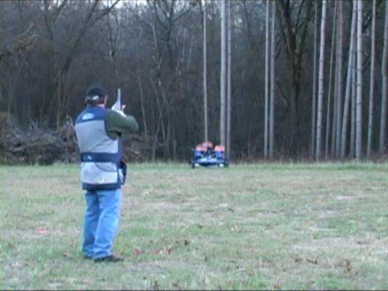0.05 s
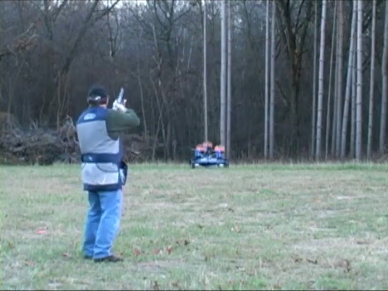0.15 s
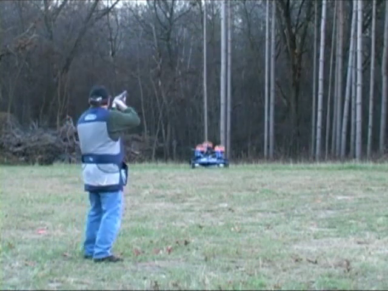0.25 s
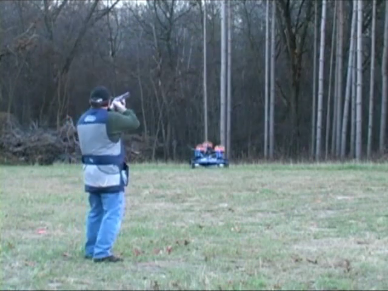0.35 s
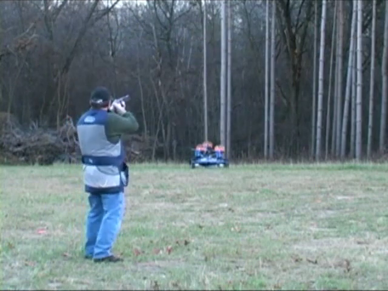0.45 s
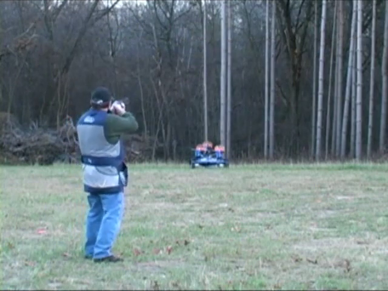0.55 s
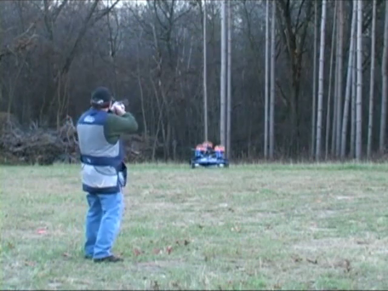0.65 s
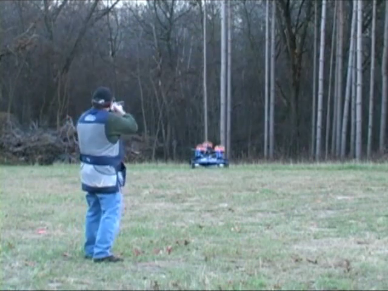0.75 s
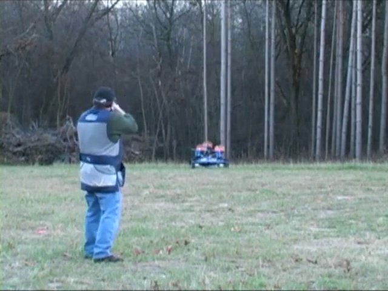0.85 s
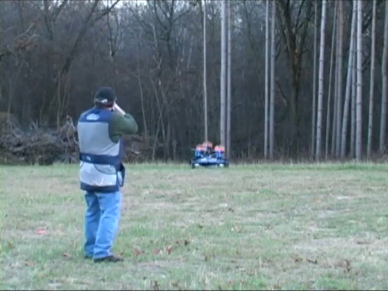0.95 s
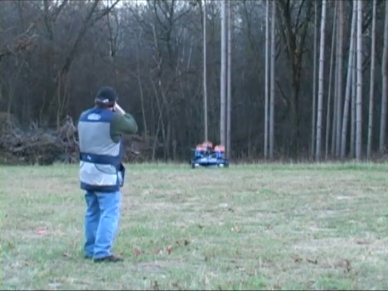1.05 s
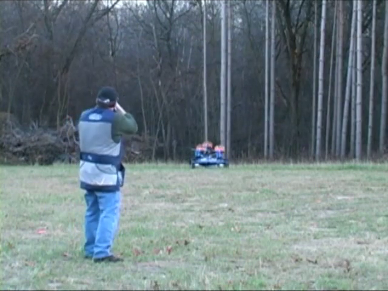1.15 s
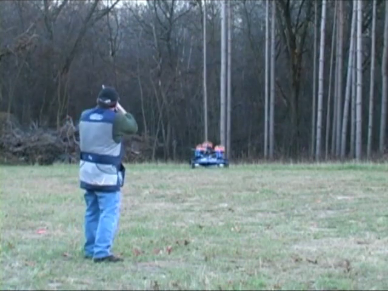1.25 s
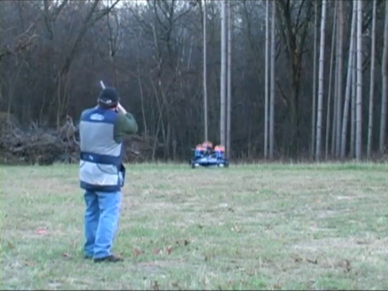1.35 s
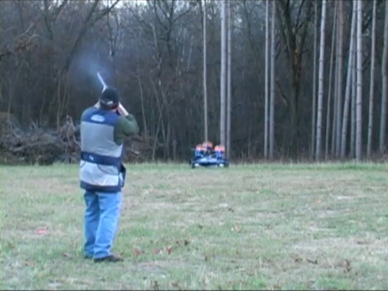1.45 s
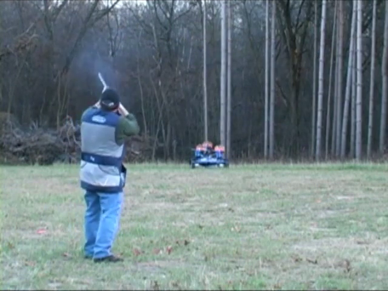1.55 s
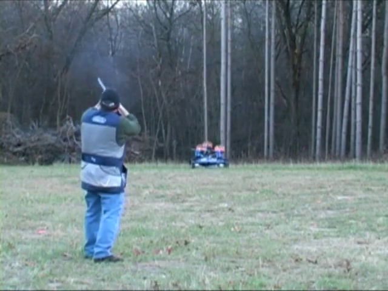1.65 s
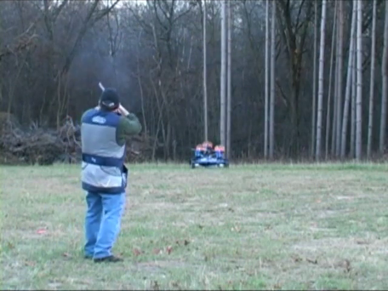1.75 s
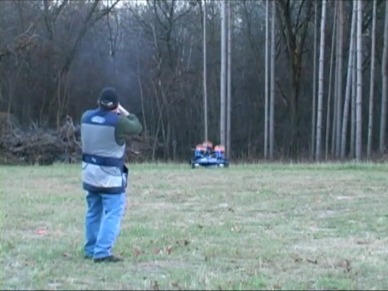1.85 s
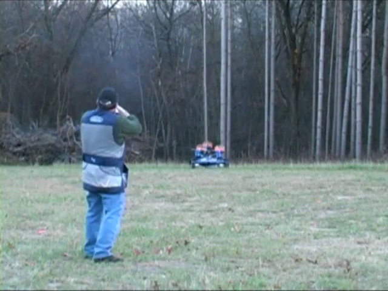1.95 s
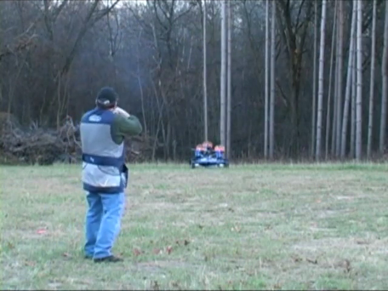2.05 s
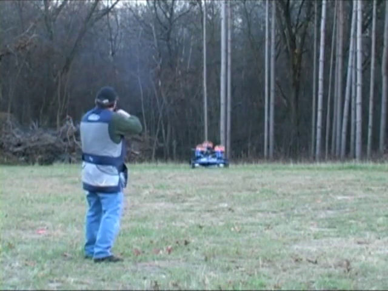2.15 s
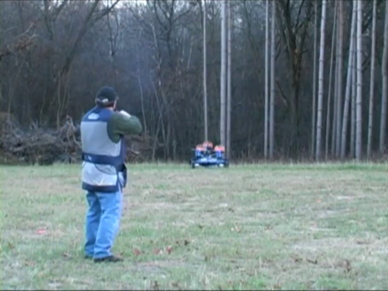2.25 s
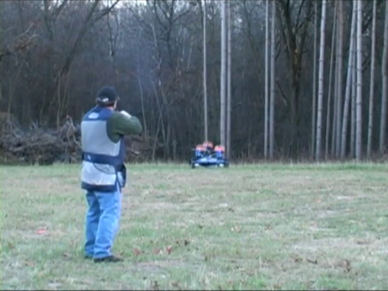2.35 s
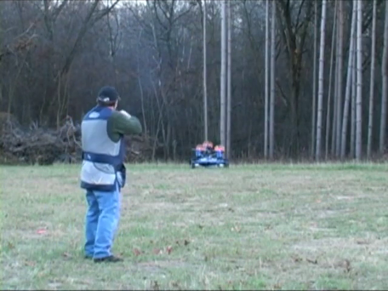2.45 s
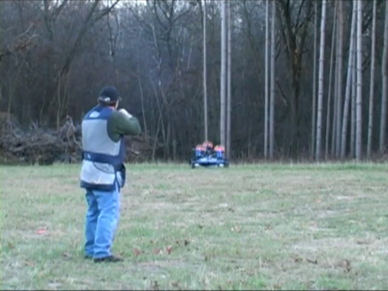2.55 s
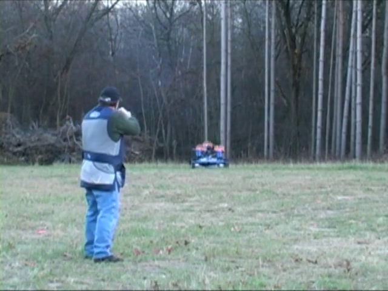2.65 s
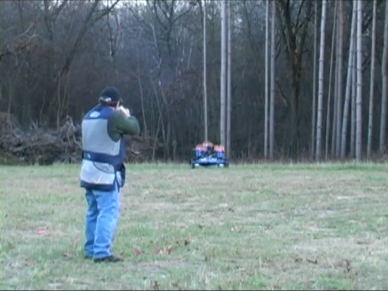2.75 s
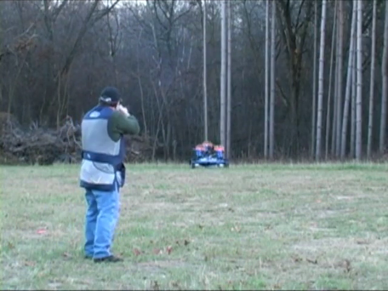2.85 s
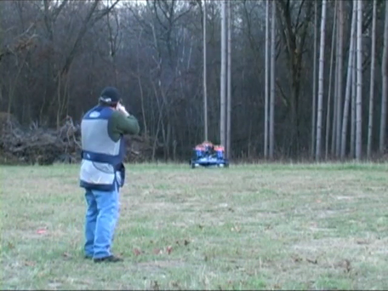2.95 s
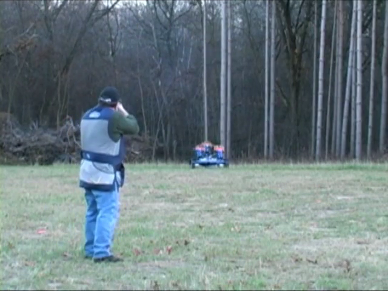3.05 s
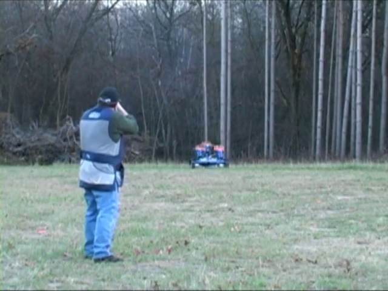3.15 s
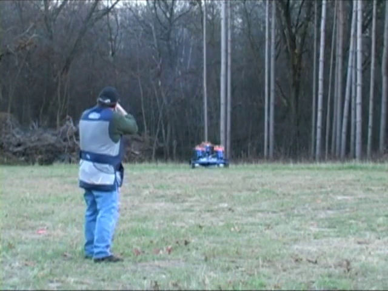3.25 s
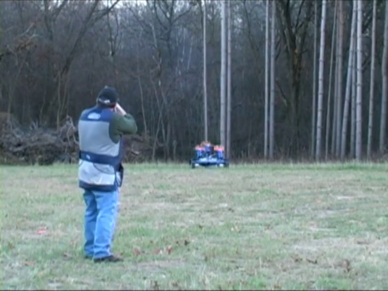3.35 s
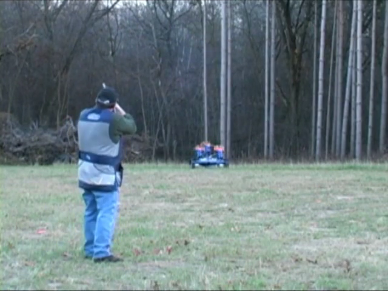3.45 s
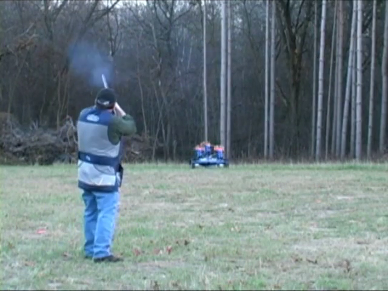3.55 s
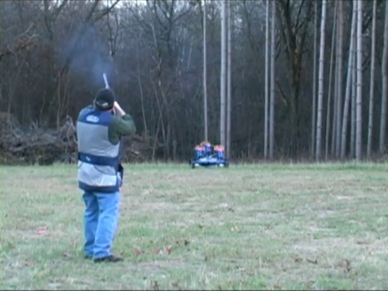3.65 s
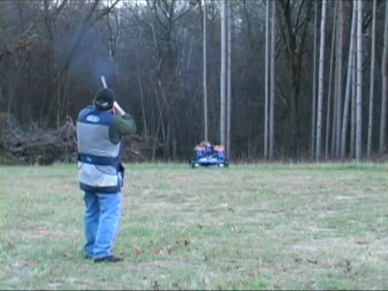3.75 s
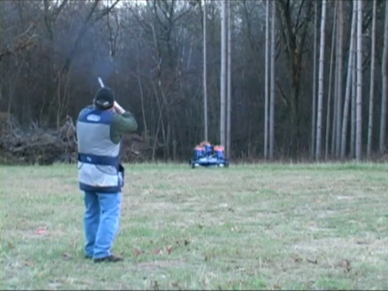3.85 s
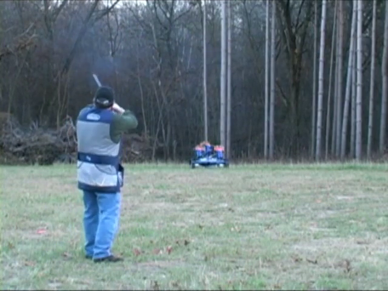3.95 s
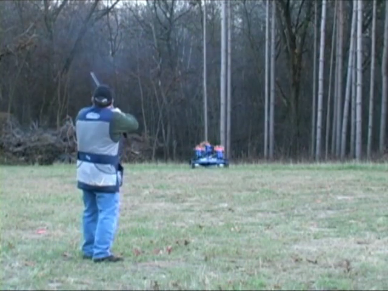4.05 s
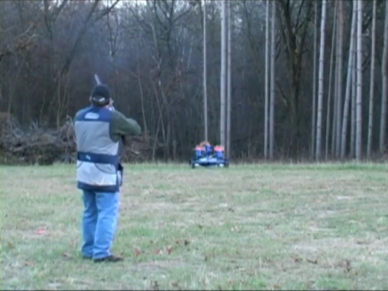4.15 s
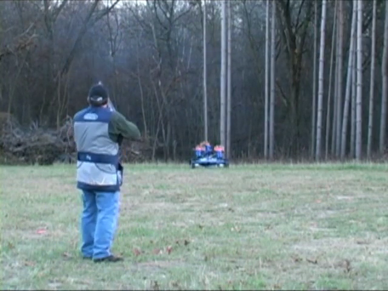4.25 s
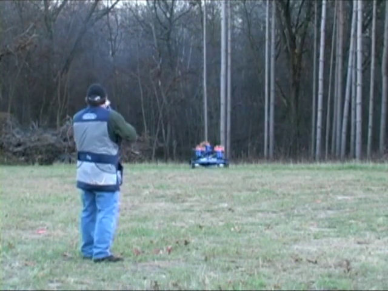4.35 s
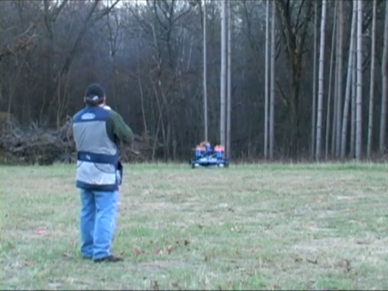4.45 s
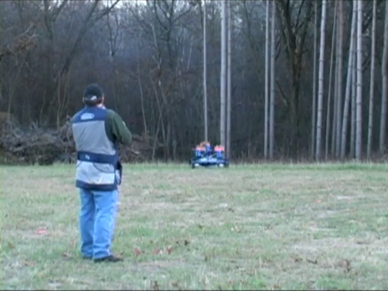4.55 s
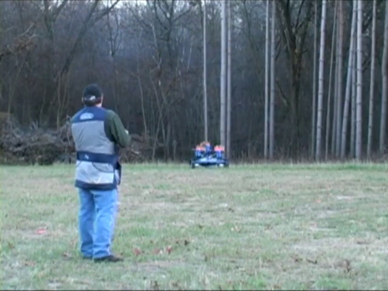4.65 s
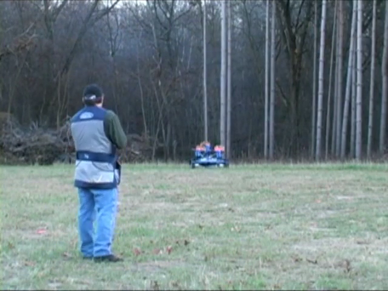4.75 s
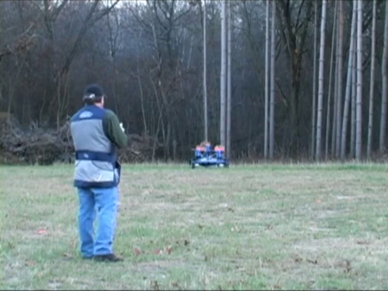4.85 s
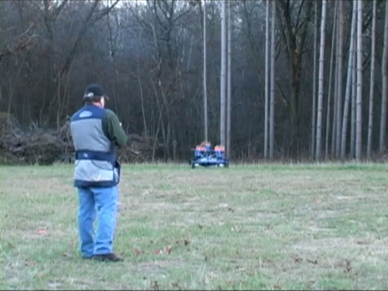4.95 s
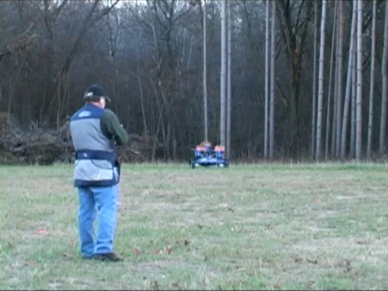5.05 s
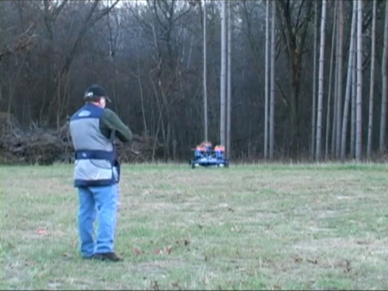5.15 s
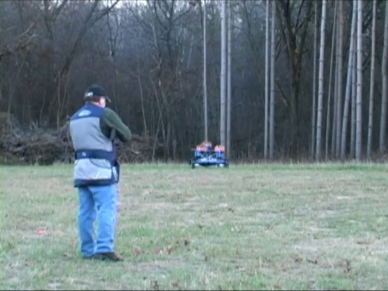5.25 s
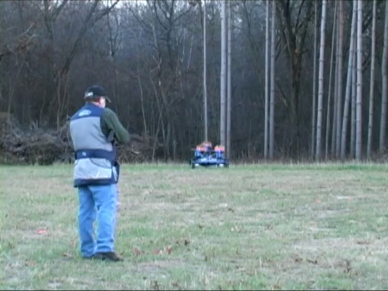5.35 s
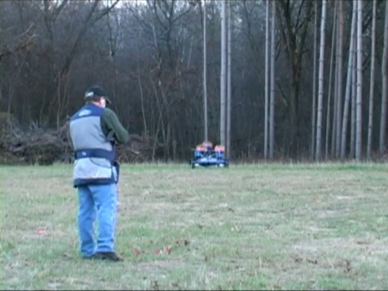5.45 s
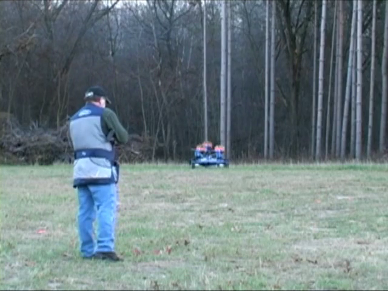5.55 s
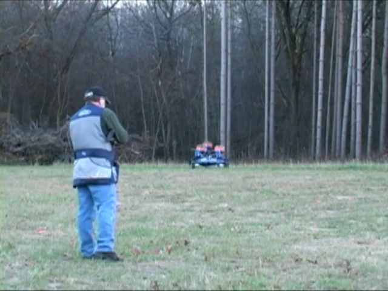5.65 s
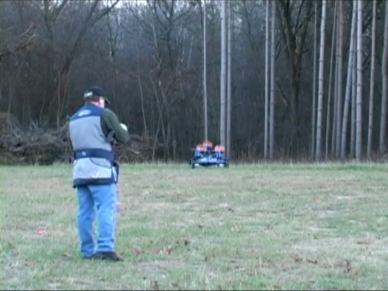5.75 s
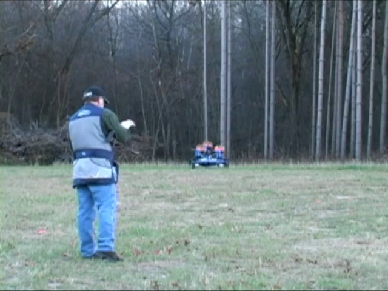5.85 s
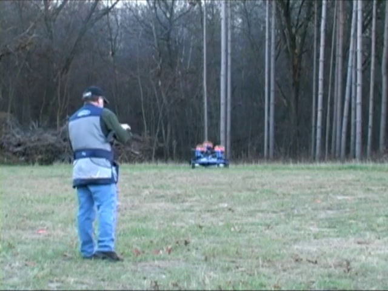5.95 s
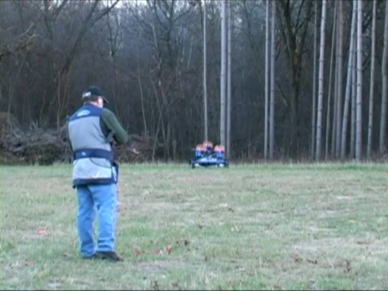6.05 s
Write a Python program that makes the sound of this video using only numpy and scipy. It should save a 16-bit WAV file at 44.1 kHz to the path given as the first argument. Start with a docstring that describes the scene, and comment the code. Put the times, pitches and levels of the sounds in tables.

```python
"""Two shotgun blasts by bare woods

Each blast is a noise crack on a slow pressure swing, loud enough to overload the input. Near objects
return single slaps; then the woods scatter it as noise into a long roll that the air dulls.
A clay thrower scrapes, rings and rattles before each shot. Handling the gun and shells makes short
ringing knocks, a ping of brass and soft cloth rustles, over far traffic, light air and a quiet hiss."""
import sys
import numpy as np
from scipy import signal
from scipy.fft import rfft, irfft, next_fast_len
from scipy.io import wavfile
from scipy.ndimage import uniform_filter1d

SR = 44100
rng = np.random.default_rng(int(sys.argv[2]) if len(sys.argv) > 2 else 0)


def file_out(sig):
    """Save sig as 16-bit WAV at sys.argv[1]."""
    # one column per channel
    cols = np.atleast_2d(sig).T
    # limit, then scale
    lim = np.clip(cols, -1, 1)
    pcm = np.round(lim * 32767).astype(np.int16)
    wavfile.write(sys.argv[1], SR, pcm)


N = 269391
TIME = np.arange(N) / SR
STEREO = np.array([[1], [-1]])  # left plus, right minus


def shots():
    """Each shot sends out a blast, then single slaps and the roll of the woods arrive later."""
    # the two shots: t/s, blast level/dB, lead-in level/dB, boom change/dB, brightness/dB per octave
    shot_list = [(1.5148, 3, -14.5, -0.4, 1.17), (3.6273, -2, -6, -3.5, 1)]
    # single reflectors: delay/s, crack level of first shot/dB, of second shot/dB, centre f/Hz,
    # thump level/dB, left minus right/dB
    reflectors = [(.0370, -2.5, -3.5, 3770, -6.5, 2), (0.046, -33, -22, 3500, -45, -2),
                  (0.0545, -26, -24, 2640, -43, 18), (0.078, -22, -26.5, 2470, -44, 30),
                  (0.09, -20.5, -24, 1010, -44, 24), (.1160, -20, -21, 2190, -41, 27),
                  (0.123, -17.5, -32, 2440, -40, 18), (.1305, -25, -13.5, 3300, -28, -7),
                  (0.141, -11, -38, 1990, -30, .3), (0.16, -2.5, -5.5, 1540, -16, 3),
                  (0.1667, -8.5, -11, 1350, -16, -8), (.2370, -21, -23, 475, -9, -1.5),
                  (.2600, -12, -21, 3000, -26, 0), (0.2855, -6, -5, 2500, -29, 1),
                  (0.301, -7, -5, 3000, -17, 5), (0.3117, -16, -4, 2520, -44, -6),
                  (.3490, -15, -19, 2020, -11, -9), (.3590, -15, -34, 1490, -21, -7)]
    out = np.zeros((2, N))
    for k, (s, blast_db, lead_db, boom_db, tilt_db) in enumerate(shot_list):
        add(out, s - .004, blast(blast_db, lead_db))
        add(out, s + .004, woods(boom_db, tilt_db))
        for delay, *crack_db, hz, thump_db, pan_db in reflectors:
            # lone trunks at the wood's edge answer shorter
            t60 = 0.014 if delay < .25 else 0.0082
            add(out, s + delay, slap(crack_db[k], hz, thump_db, t60), pan_db)
    return out


def blast(db, lead_db, lead_s=0.0036, hold_s=0.004):
    """Turbulent muzzle crack riding on a suction that swings slowly back; a short lead-in comes first."""
    # colour of the crack: f/Hz, relative level/dB per Hz
    crack_colour = [(180, -19), (300, -9.5), (2450, -4.5), (3560, -9.5), (4430, -3.5), (8250, -14),
                    (11600, -13), (12400, -19), (16100, -45), (22000, -120)]
    t = np.arange(4096) / SR - lead_s
    mid, side, lead_noise = rng.standard_normal((3, len(t)))
    envelope = np.where(t < hold_s, t >= 0, fade(t - hold_s, 0.0061))
    crack = colour(mid + 0.15 * side * STEREO, crack_colour) * envelope
    suction = -.42 * np.exp(-((t - .002) / .0027) ** 2)
    swing_back = .105 * np.exp(-((t - .014) / .011) ** 2) * np.clip(t / .008, 0, 1)
    # a 900 Hz tone with broad noise, ending where the crack starts
    lead = np.sin(2 * np.pi * 900 * t) + .5 * ring(lead_noise, 3000., 4000.)
    lead = lead * np.clip((t + lead_s) / .001, 0, 1) * (t < 0)
    return undb(db) * crack + suction + swing_back + undb(lead_db) * lead


def slap(crack_db, hz, thump_db, t60):
    """One reflector returns a burst in its own colour and, just behind it, a low thump."""
    # colour shared by all the bursts: f/Hz, relative level/dB per Hz
    burst_colour = [(200, -6), (600, 15), (2000, 8.5), (6000, 9), (9500, -3.5), (12500, -33)]
    t = np.arange(8192) / SR
    noise = colour(rng.standard_normal(len(t)), burst_colour)
    burst = noise * fade(t, t60) * np.minimum(1, t / 0.00062)
    crack = .5 * burst + 1.82 * ring(burst, hz, 0.38 * hz)
    late = t - .0015
    thump = np.sin(2 * np.pi * 253.0 * late) * fade(late, 0.025)
    return undb(crack_db) * crack + undb(thump_db) * thump


def woods(boom_shift_db, tilt_db):
    """Noise scattered by grass and trees, split into bands that each fade by their loss in air."""
    # level of the scattered sound: delay/s, level/dB
    roll = [(0, -13), (0.033, -21), (.11, -19), (.16, -11.5), (.232, -9.5), (.246, -5.5), (.34, -2),
            (.75, -6.5), (1.6, -23), (2.5, -31)]
    s, level_db = np.transpose(roll)
    n = next_fast_len(int(s[-1] * SR))
    t = np.arange(n) / SR
    broad_db = np.interp(t, s, level_db)
    boom_db = bass_boom_db(t) + boom_shift_db
    hump_db = mid_hump_db(t)
    both, octave = scattered(t, tilt_db)
    boom_hz, boom_oct, hump_hz, hump_oct = 225, 0.76, 831, 0.63  # centres and half widths
    air_db, air_power, air_ease = 16.5, 1.478, 1  # loss at 3 kHz after 1 s, exponents of pitch and delay
    hiss_db, hiss_top_hz = -37.5, 8500.  # faint treble hiss that follows the level of the roll
    out = 0
    for centre in np.arange(-15, 13) / 3:  # third-octave steps, counted in octaves from 1 kHz
        band = irfft(both * np.clip(1 - 3 * abs(octave - centre), 0, 1), n)
        f = 1000 * 2 ** centre
        boom = np.exp(-(np.log2(f / boom_hz) / boom_oct) ** 2)
        hump = np.exp(-(np.log2(f / hump_hz) / hump_oct) ** 4)
        loss_db = air_db * (f / 3000) ** air_power * t ** air_ease
        hiss = undb(hiss_db) / (1 + (f / hiss_top_hz) ** 8)
        flicker_db = 1.3 * walk(9, n)
        band_db = broad_db + boom * boom_db + hump * hump_db + flicker_db
        out = out + band * undb(band_db) * (undb(-loss_db) + hiss)
    return out


def bass_boom_db(t):
    """Extra bass from the near ground just after the blast, then from the wood's edge all at once."""
    ground_db, ground_s, steady_db = 15, .06, -1.2
    edge_s, boom_shift_db, rise_s, hold_s, fall_s = 0.227, 11, 0.0069, 0.066, 0.045
    edge = ramp(t, edge_s, rise_s) - ramp(t, edge_s + hold_s, fall_s)
    return ground_db * np.exp(-t / ground_s) + boom_shift_db * edge + steady_db


def mid_hump_db(t):
    """Extra middle pitches that grow as the far stands answer and sink at the end."""
    hump_db, from_s, rise_s, until_s, sink_db_per_s = 6.5, .28, .2, 1.78, 7
    return hump_db * ramp(t, from_s, rise_s) - sink_db_per_s * np.maximum(t - until_s, 0)


def scattered(t, tilt_db):
    """Stereo spectrum of the scattered noise: grainy where trunks answer apart, smooth elsewhere."""
    # colour of the scattered sound: f/Hz, level/dB per Hz
    trunk_colour = [(30, -21), (70, -10), (130, -3.5), (240, 5), (350, -1), (500, -2), (900, -2),
                    (1500, -4.5), (2200, -2), (4000, -4), (7000, -5), (12500, -11.5)]
    # left-right difference against the middle: f/Hz, level/dB
    wood_width = [(60, -27.5), (190, -11), (350, -11), (630, -15.5), (1130, -4.5), (2040, -5.5),
                  (3680, -11), (6620, -96), (11900, -36)]
    # balance: f/Hz, left minus right/dB
    wood_pan = [(60, -2.5), (110, -0.5), (190, -0.5), (350, -0.5), (630, 1), (1130, 3.5), (2040, 2),
                (3680, 1), (6620, -2.5), (11900, 5)]
    # phase of the middle signal: f/Hz, lead of the left side/radians
    wood_lead = [(60, 0.024), (260, -0.1), (690, -0.91), (1290, 0.17), (3360, -0.82), (4050, 0.21),
                 (5900, 0)]
    n = len(t)
    trunks = grains(420., 2.7, .0008, n)
    clear = .5 * np.exp(-((t - .3) / .22) ** 2)  # share of separate bursts
    texture = np.sqrt(clear * trunks ** 2 + 1 - clear)
    # stands of trees at uneven distances make the roll surge
    surge = undb(3.1 * walk(21.9, n))
    mid, side = rfft(texture * rng.standard_normal((2, n)) * surge)
    octave = np.log2(np.maximum(np.arange(n // 2 + 1) * SR / n, 1) / 1000)
    hz = 1000 * 2 ** octave
    mid_db = at(trunk_colour, hz) + tilt_db * octave
    mid = mid * undb(mid_db)
    side = side * undb(mid_db + at(wood_width, hz))
    both = mid * np.exp(.5j * STEREO * at(wood_lead, hz)) + side * STEREO
    return both * undb(STEREO * at(wood_pan, hz) / 2), octave


def thrower():
    """The clay scrapes along the arm, louder until it leaves; the arm rings, swings back and rattles out."""
    # swings of the arm: t of the stop/s, scrape and ring level/dB, rattle level/dB
    swings = [(0.614, -37, -52.5), (2.80, -39.5, -51)]
    # colour of the scrape: f/Hz, relative level/dB per Hz
    scrape_colour = [(1290, -50), (2200, -18), (2590, -10), (3270, 3), (3770, 7.5), (4380, 2), (5120, 8.5),
                     (6560, -3.5), (7840, 6), (9700, -7.5), (12000, -19), (15600, -48), (22000, -120)]
    # ring of the stopped arm: f/Hz, width/Hz, relative level/dB
    arm_ring = (5250., 60., -3)
    arm_hz, arm_width, arm_db = arm_ring
    noise = rng.standard_normal(N) * (1.1 + grains(350., 2.5, .0012, N))
    arm = colour(noise, scrape_colour)
    rattle = ring(ring(noise, 3500.0, 1100.), 2600.0, 1300.0)
    rattle = rattle + 0.94 * ring(noise, 4660.0, 600.) + 0.17 * ring(noise, 6800.0, 740.0)
    out = 0
    for s, level_db, rattle_db in swings:
        t = TIME - s
        # swell before the stop, then a quick and a slow fade
        scrape = (fade(-t, 0.15) * (t < 0) + 1.3 * fade(t, 0.052) + 0.14 * fade(t, 0.67)) * arm
        stop = ring(noise * np.exp(-((t - .008) / .004) ** 2), arm_hz, arm_width)
        shake = fade(t - .13, 0.94) * (t > .13) + np.clip(t / 0.1, 0, 1) ** 1.1 * (t <= .13)
        out = out + undb(level_db) * (scrape + undb(arm_db) * stop / abs(stop).max())
        out = out + undb(rattle_db + 1.0 * walk(34, N)) * shake * rattle / rattle.std()
    return out


def handling():
    """Short knocks from handling gun and shells, each noise ringing its own band, and a ping of brass."""
    # knocks: t/s, peak level before panning/dB, left minus right/dB, centre f/Hz, t60 of the blow/s
    knocks = [(0.134, -40.5, 10, 2980, 0.017), (.1350, -39, 6, 670, 0.013), (.3536, -46, .3, 5000, .03),
              (0.388, -39, 7, 2600, 0.012), (0.406, -36.5, 11, 2950, 0.016), (0.958, -41, .3, 4600, 0.036),
              (1.314, -41, .3, 4500, 0.039), (1.341, -34, 0, 3760, 0.068), (2.690, -44, .3, 5000, 0.036),
              (3.268, -45, -1, 4500, 0.033), (3.446, -43, 1, 6040, 0.13), (3.473, -35.5, -2, 4340, 0.1),
              (3.534, -36, -1, 3460, 0.065), (3.541, -37, 1, 3000, 0.13), (5.0176, -43, 3, 6000, 0.12),
              (5.1228, -31.5, .3, 5860, 0.064), (5.1637, -34, .3, 7500, 0.027),
              (5.3733, -46, 8, 5000, .015), (5.5254, -47, 11, 5000, 0.036), (5.7579, -39.5, -2, 5000, .015),
              (5.7953, -47, 7, 7000, .015), (5.862, -28, 5, 1380, 0.014), (5.891, -34, 10, 3500, 0.014),
              (5.8950, -37, 10, 4850, 0.11), (5.8958, -29, 11, 2300, 0.02), (5.9587, -37.5, 9, 4080, 0.012),
              (6.054, -38.5, 15, 4100, 0.011)]
    out, t = np.zeros((2, N)), np.arange(4096) / SR
    for s, db, pan_db, hz, t60 in knocks:
        # width is 0.64 of the centre at 3 kHz; higher knocks ring broader
        width = 0.64 * 3000 * (hz / 3000) ** 1.63
        blow = rng.standard_normal(len(t)) * fade(t, t60) * np.minimum(1, t / 0.00014)
        knock = ring(ring(blow, hz, width), hz, 2 * width) + .08 * ring(blow, 1800., 3000.)
        add(out, s, undb(db) * knock / abs(knock).max(), pan_db)
    # strikes on a shell's brass: t/s, peak level before panning/dB
    strikes = [(5.4504, -43), (5.4547, -33.5)]
    brass = brass_ping(t)
    for s, db in strikes:
        add(out, s, undb(db) * brass / abs(brass).max(), 16)
    return out


def brass_ping(t):
    """A shell's brass rings in a few fading tones; the pitch rises a little as the contact lets go."""
    # tones of the brass: f/Hz, relative level/dB, t60/s
    tones = [(3260, 4, 0.057), (7200, -17, .05), (9560, -23, .04), (11100, -22, .04)]
    turns = t - .06 * .004 * (1 - np.exp(-t / 0.0033))  # time bent to lower the first moments
    brass = sum(undb(db) * np.sin(2 * np.pi * hz * turns) * fade(t, t60) for hz, db, t60 in tones)
    return brass * np.minimum(1, t / 0.0005)


def cloth():
    """Cloth brushing as the gun moves: soft swells of noise in one band."""
    # brushes: centre t/s, half length/s, level/dB, centre f/Hz, width/Hz
    brushes = [(1.47, 0.12, -60.5, 11000, 2000), (.98, 0.1, -60, 2700, 1500)]
    out = 0
    for s, half, db, hz, width in brushes:
        swell = undb(db + 2.5 * walk(60, N)) * np.exp(-((TIME - s) / half) ** 2)
        even_level = np.sqrt(SR / np.pi / width)  # makes up for the narrow band
        out = out + swell * even_level * ring(rng.standard_normal(N), hz, width)
    return out


def field():
    """Far traffic, light air and hiss as one coloured stereo noise whose bass wavers."""
    # colour of the background: f/Hz, relative level/dB per Hz
    field_colour = [(15, -50.5), (25, -27.5), (76, -5), (318, -15), (382, -18.5), (676, -17), (1170, -22.5),
                    (1260, -24), (1960, -27), (2410, -28), (3750, -29), (5250, -30), (12400, -39),
                    (16100, -60.5), (22000, -120)]
    # left-right difference against the middle: f/Hz, level/dB
    field_width = [(60, -6), (190, 7), (630, -6.5), (2040, -0.5), (3680, -6), (6620, -48), (11900, -14.5)]
    # broad rise in the hiss: f/Hz, width/Hz, level/dB
    hiss_bump = (4860, 310, -8)
    bump_hz, bump_width, bump_db = hiss_bump
    mid, side = rng.standard_normal((2, N))
    side = irfft(rfft(side) * undb(at(field_width, np.arange(N // 2 + 1) * SR / N)), N)
    hush = colour(mid + side * STEREO, field_colour)
    bass = signal.sosfilt(signal.butter(2, 300, fs=SR, output="sos"), hush)
    hush = hush + undb(bump_db) * ring(hush, bump_hz, bump_width)
    waver = undb(0.74 * walk(3.7, N)) - 1
    return undb(-48.5) * (hush + bass * waver)


def undb(db):
    """Decibels to a plain factor."""
    return 10 ** (np.asarray(db) / 20)


def at(table, hz):
    """Value of a (Hz, value) table on a log-frequency axis."""
    table_hz, value = np.array(table).T
    return np.interp(np.log(np.maximum(hz, 1)), np.log(table_hz), value)


def colour(x, table):
    """Filter by a (Hz, dB) table, then set the rms to 1."""
    n = x.shape[-1]
    y = irfft(rfft(x) * undb(at(table, np.arange(n // 2 + 1) * SR / n)), n)
    return y / np.sqrt(np.mean(y ** 2))


def ring(x, hz, width):
    """Two-pole resonance, gain 1 at the centre."""
    hz = min(hz, .45 * SR)
    b, a = signal.iirpeak(hz, hz / width, fs=SR)
    return signal.lfilter(b, a, x)


def fade(t, t60):
    """Silent before 0, then from 1 down by 60 dB in t60 seconds."""
    return (t >= 0) * 10 ** (-3 * np.maximum(t, 0) / t60)


def ramp(t, start, length):
    """0 before start, 1 after start + length."""
    return np.clip((t - start) / length, 0, 1)


def walk(rate, n):
    """Random levels held 1 / rate seconds and smoothed twice; spread near 0.3."""
    k = int(SR / rate)
    steps = np.repeat(rng.standard_normal(n // k + 1), k)
    return 0.39 * uniform_filter1d(uniform_filter1d(steps, k), k)[:n]


def grains(per_s, spread_db, length_s, n):
    """Envelope of short bursts at random moments, of uneven size; rms 1."""
    hit, size = rng.random(n), rng.standard_normal(n)
    k = int(length_s * SR)
    spikes = (hit < per_s / SR) * undb(spread_db * size)
    env = uniform_filter1d(uniform_filter1d(spikes, k), k)
    return env / np.sqrt(np.mean(env ** 2))


def add(out, s, x, pan_db=0.):
    """Mix a sound in at s seconds; pan_db is left minus right."""
    i = int(s * SR)
    x = (x * undb(STEREO * pan_db / 2))[:, :N - i]
    out[:, i:i + x.shape[1]] += x


def scene():
    """All the sources together: shots, thrower, handling, cloth and background."""
    return shots() + thrower() + handling() + cloth() + field()


def record(dry):
    """The input rounds loud peaks and flattens at full scale; the top is cut."""
    top_hz = 12300
    full = dry / (1 + abs(dry) ** 4) ** (1 / 4)
    cut = signal.sosfilt(signal.ellip(10, .2, 70, top_hz, fs=SR, output="sos"), full)
    return np.clip(cut, -1, 1)


dry = scene()
out = record(dry)
file_out(out)
```